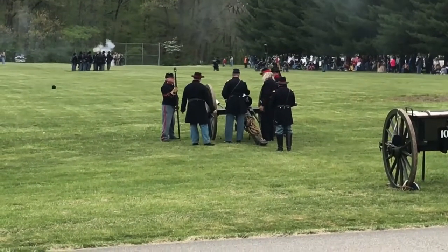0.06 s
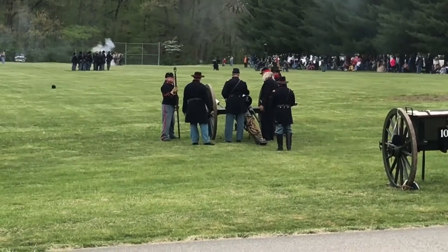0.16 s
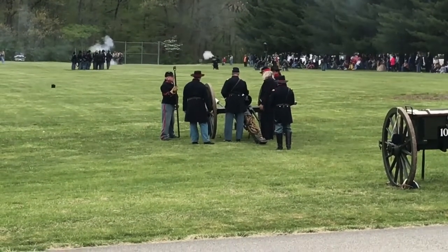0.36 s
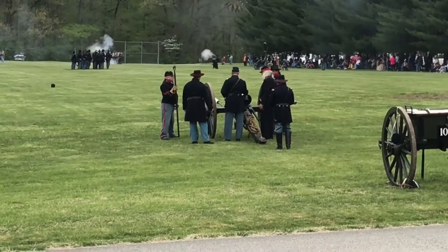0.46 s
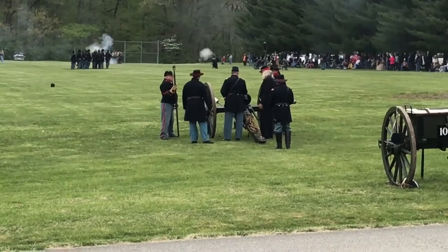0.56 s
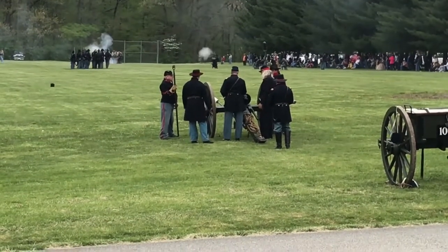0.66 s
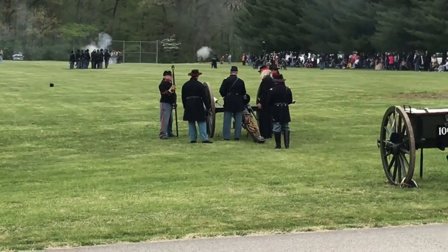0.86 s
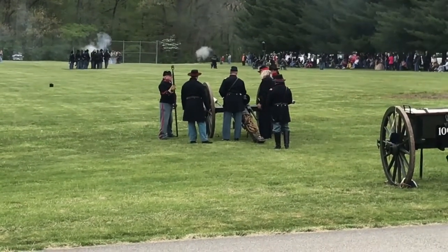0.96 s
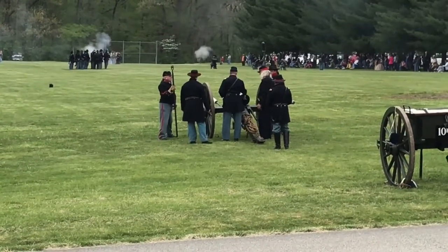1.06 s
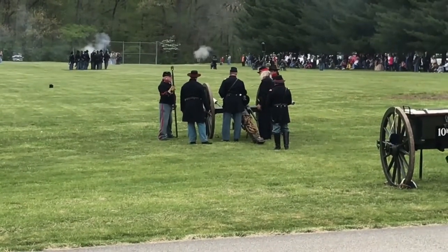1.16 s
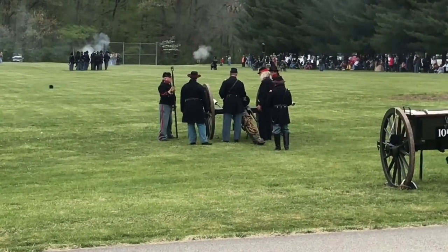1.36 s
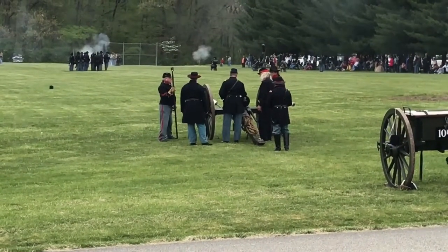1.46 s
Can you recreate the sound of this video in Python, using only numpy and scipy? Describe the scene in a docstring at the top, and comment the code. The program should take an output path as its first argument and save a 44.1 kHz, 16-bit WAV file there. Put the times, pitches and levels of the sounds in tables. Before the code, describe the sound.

Distant black-powder muskets crack in a quick uneven cluster, echoes rolling back from the woods

```python
"""A wide mown field ringed by trees, with black-powder muskets firing far from the microphone.
Short cracks are sums of quickly dying modes with a spray of noise; a few milliseconds behind some of them
come low thumps that crept along the grass, swings that sag in pitch, and the trees return such swings upside down.
The woods send back a wash of noise bands, duller the further it has come, over a rolling low rumble."""
import sys
import numpy as np
from scipy import signal
from scipy.io import wavfile

SR = 44100
rng = np.random.default_rng(int(sys.argv[2]) if len(sys.argv) > 2 else 0)


def file_out(sig):
    """Save sig as 16-bit WAV at sys.argv[1]."""
    # one column per channel
    cols = np.atleast_2d(sig).T
    # limit, then scale
    lim = np.clip(cols, -1, 1)
    pcm = np.round(lim * 32767).astype(np.int16)
    wavfile.write(sys.argv[1], SR, pcm)


def gain_from_decibels(decibels):
    """Convert decibel values to linear amplitude factors."""
    exponent = np.asarray(decibels, float) / 20
    return 10 ** exponent


N = 66150
T = np.arange(N) / SR


def rms_one(x):
    """Scale to rms 1."""
    return x / np.sqrt(np.mean(x ** 2) + 1e-20)


def in_time(rows):
    """Read the columns of a curve, whose first column is t/s, at every sample."""
    s, *columns = np.transpose(rows)
    return [np.interp(T, s, column) for column in columns]


def drift(rate_hz):
    """Slow random wander of rms 1: noise at a fortieth of the sample rate through two equal low-pass poles."""
    pole = np.exp(-2 * np.pi * rate_hz * 40 / SR)
    noise = rng.standard_normal(N // 40 + 2002)
    slow = signal.lfilter([1], [1, -2 * pole, pole ** 2], noise)[2000:]   # settled part only
    return np.interp(np.arange(N) / 40, np.arange(len(slow)), rms_one(slow))


def bands(spectrum, first_hz, count):
    """Centres and signals of third-octave noise bands, shaped by a spectrum; their sum has rms 1."""
    edges_hz = first_hz * 2 ** (np.arange(count + 1) / 3)
    centres_hz = np.sqrt(edges_hz[1:] * edges_hz[:-1])
    white = rng.standard_normal((2, N + SR // 2))   # neighbouring bands take different noise
    filtered = []
    for k in range(count):
        sos = signal.butter(3, edges_hz[k:k + 2], "band", fs=SR, output="sos")
        filtered.append(signal.sosfilt(sos, white[k % 2])[-N:])
    f, db = np.transpose(spectrum)
    band_db = np.interp(np.log(centres_hz), np.log(f), db)
    shaped = np.array(filtered) * gain_from_decibels(band_db)[:, None]
    return centres_hz, shaped / np.sqrt(np.mean(shaped.sum(0) ** 2))


def cracks():
    """Every mode, signs alternating, swells for a moment and dies; a spray of noise follows."""
    # cracks reaching the microphone: [t/s, peak level/dB, pitch ratio, brightness/dB per octave about 1500 Hz]
    crack_rows = [(0.196, -3.5, 0.96, 1.5), (0.2105, -37, 1.0, 3.0), (.2345, -3, 0.912, 7.5),
                  (.2351, -2, 0.6665, -1), (.4321, -15, 1.02, -.5), (.4335, -13, 1.02, 1.0),
                  (.4342, -13, 1.02, -.5), (.4349, -12, 1.02, -1.5), (.5245, -27.5, 0.63, -16),
                  (0.5973, -15.5, 0.99, -0.5)]
    # ringing once the paths over the grass have mixed: [f/Hz before the pitch ratio, level/dB, t60/s]
    crack_modes = [(556, -12.5, 0.0091), (1040, -4, 0.013), (1578, 4.3, 0.0085), (2570, -4.5, 0.0056),
                   (2950, -2.5, 0.0068), (3910, -17.5, 0.0065), (4773, -13, .006), (5800, -20, 0.0053),
                   (7250, -11, 0.0011), (9850, -28, 0.0033), (11500, -29.5, 0.0016), (13800, -44, .002)]
    spray_db, spray_t60_s = -20.5, 0.038   # scatter off ground and people; level relative to the crack
    spray_band_hz = [740, 4740]
    ringing, spray_gate = np.zeros(N + SR), np.zeros(N + SR)
    t = T[:SR // 10, None]
    hz, mode_db, t60_s = np.transpose(crack_modes)
    signs = (-1) ** np.arange(len(hz))
    k = t * 1.5 * np.log(1000) / t60_s
    swell = k * np.exp(1 - k)   # peaks at 1, then dies
    for s, db, ratio, bright_db in crack_rows:
        levels = signs * gain_from_decibels(mode_db + bright_db * np.log2(hz / 1500))
        wave = (levels * swell * np.sin(2 * np.pi * hz * ratio * t)).sum(1)
        i = int(s * SR)
        ringing[i:i + len(t)] += gain_from_decibels(db) * wave / np.abs(wave).max()
        spray_gate[i:i + len(t)] += gain_from_decibels(db - 60 * t[:, 0] / spray_t60_s)
    sos = signal.butter(2, spray_band_hz, "band", fs=SR, output="sos")
    noise = signal.sosfilt(sos, signal.sosfilt(sos, rng.standard_normal(N)))
    return ringing[:N] + gain_from_decibels(spray_db) * spray_gate[:N] * rms_one(noise)


def low_swings(rows, sag_s):
    """A few low swings around a trough; the lowest pitches travel slowest, so the pitch sags."""
    rise_s, fall_s = 0.0043, 0.007   # both for a length factor of 1
    out = 0
    for s, db, hz, length, hold_s in rows:
        early, late = np.minimum(T - s, 0), np.maximum(T - s, 0)
        turns = hz * (early + sag_s * np.log(1 + late / sag_s))   # pitch halves sag_s after the trough
        rise = (early / length / rise_s) ** 2
        fall = np.maximum(late - hold_s, 0) / length / fall_s
        out = out - gain_from_decibels(db) * np.exp(-rise - fall) * np.cos(2 * np.pi * turns)
    return out


def thumps():
    """Low thumps that crept along the grass, their pitch sagging fast."""
    # thumps along the ground: [t/s of the deepest trough, peak level/dB, f/Hz up to it, length factor, hold/s]
    thump_rows = [(.2379, -2, 211, 0.61, 0.0016), (.245, .8, 146, 1.1, .006),
                  (.444, -7.5, 160, 0.79, 0.0025), (.6, -22, 113, 0.86, 0)]
    return low_swings(thump_rows, sag_s=0.0052)


def tree_returns():
    """Thumps returned upside down by the trees, their pitch sagging slowly."""
    # thumps off the trees: [t/s of the highest crest, peak level/dB, f/Hz up to it, length factor, hold/s]
    return_rows = [(.045, -17.5, 77, 2.4, 0), (.2685, -9.5, 162, 1.2, 0), (.31, -16, 121, 0.82, 0),
                   (.508, -25, 127, 1.4, 0.0058), (.8722, -15, 103, 1.9, 0), (.905, -18.5, 111, 1.2, 0),
                   (.944, -18.5, 99, 1.06, 0.0006), (1.061, -30.5, 124, 2.3, 0)]
    return -low_swings(return_rows, sag_s=0.05)


def wash():
    """Echoes from the woods; the further they have come, the more treble the air has taken."""
    # echo wash: [t/s, level/dB before treble loss,
    #             treble loss/dB at 8 kHz, below zero where the wash is brighter than its base colour]
    wash_curve = [(0, -33.5, 35), (.04, -40, 22.5), (.11, -33.5, 42), (.19, -36.5, 45), (.225, -41.5, 3),
                  (.25, -27.5, 8), (.27, -37, -12), (.274, -33.5, -5), (.3, -37, -8), (.345, -41.5, -9.5),
                  (.38, -44.5, -3), (.425, -52, -11), (.455, -41.5, 16), (.48, -36, 2.5),
                  (.52, -37.5, 11.5), (.575, -39.5, 12.5), (.644, -40, 5), (.649, -33, -2.5),
                  (.665, -38, -4), (.69, -34, 9.5), (.72, -36.5, 4), (.76, -33.5, 1), (.8, -36.5, -5),
                  (.84, -34.5, 5.5), (.87, -33.5, 17.5), (1.02, -36.5, 21), (1.25, -35.5, 33.5),
                  (1.5, -38.5, 29.5)]
    # base colour of the wash, before treble loss: [f/Hz, level/dB per Hz, relative]
    wash_spectrum = [(180, -35), (300, -13.5), (440, -8), (580, -0.34), (850, -2), (1230, -1), (2000, -4.5),
                     (3170, -7.5), (4100, -12), (6500, -22), (10000, -41.5), (16000, -55)]
    level_db, treble_loss_db = in_time(wash_curve)
    hz, noise = bands(wash_spectrum, 282, count=18)
    shared_db = 0.5 * drift(25)
    loss_share = (np.minimum(hz, 10000) / 8000) ** 1.5   # grows with frequency up to 10 kHz
    out = 0
    for share, band in zip(loss_share, noise):
        own_db = 1.24 * drift(15)
        out = out + band * gain_from_decibels(level_db - treble_loss_db * share + shared_db + own_db)
    return out


def rumble():
    """The low end of all the echoes rolls unevenly, as a whole and band by band."""
    # low end of the echoes: [t/s, level/dB]
    rumble_curve = [(0, -31), (.16, -40), (.24, -27.5), (.27, -24), (.34, -39), (.41, -33), (.47, -26.5),
                    (.57, -35.5), (.68, -31), (.83, -33), (.9, -29), (1.02, -30.5), (1.5, -34)]
    # noise colour of the rumble: [f/Hz, level/dB per Hz, relative]
    rumble_spectrum = [(15, -51), (25, -49), (49, -3.5), (86, -2), (156, -4.5), (200, -14), (227, -15),
                       (261, -21.5), (500, -20), (650, -52), (1100, -120)]
    level_db = in_time(rumble_curve)[0] + 0.66 * drift(4)
    _, noise = bands(rumble_spectrum, 22.07, count=12)
    return gain_from_decibels(level_db) * sum(band * gain_from_decibels(1.02 * drift(8.3)) for band in noise)


def scene():
    """Shots over the field, their returns off the trees, the wash and the rumble, in one channel."""
    return (cracks() + thumps() + tree_returns() + wash() + rumble())[None]


def roll_off(x):
    """The treble ends steeply here."""
    return signal.sosfilt(signal.butter(12, 16340, fs=SR, output="sos"), x)


def record(dry):
    """The microphone adds hiss, peaks are rounded smoothly and the top of the treble is cut."""
    hiss_db, overload, cutoff_hz = -76.5, 1.08, 16800   # overload: the level that peaks bend towards
    noisy = dry + gain_from_decibels(hiss_db) * rng.standard_normal(dry.shape)
    rounded = noisy / (1 + np.abs(noisy / overload) ** 4) ** (1 / 4)
    low_pass = signal.cheby2(12, 70, cutoff_hz, fs=SR, output="sos")   # 70 dB down from cutoff_hz up
    mix = signal.sosfilt(low_pass, rounded)
    return roll_off(mix)


dry = scene()
out = record(dry)
file_out(out)
```